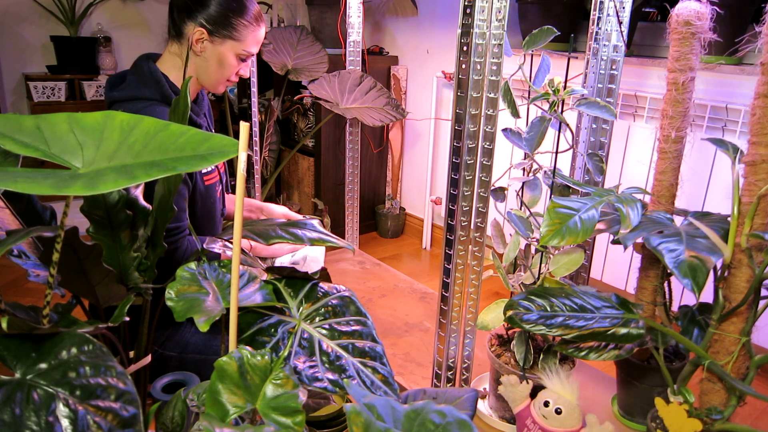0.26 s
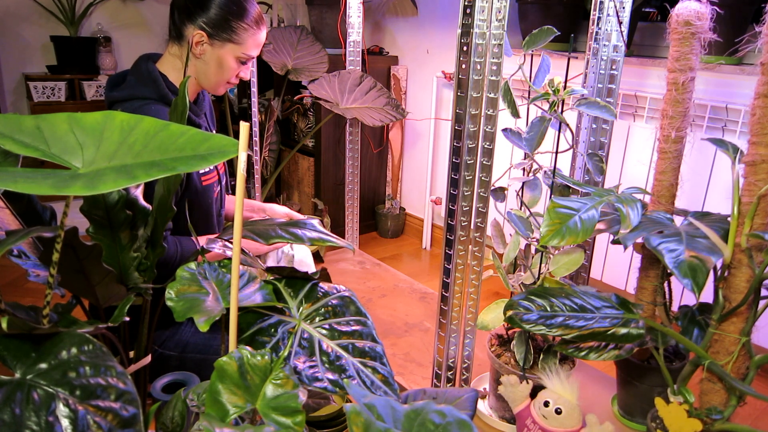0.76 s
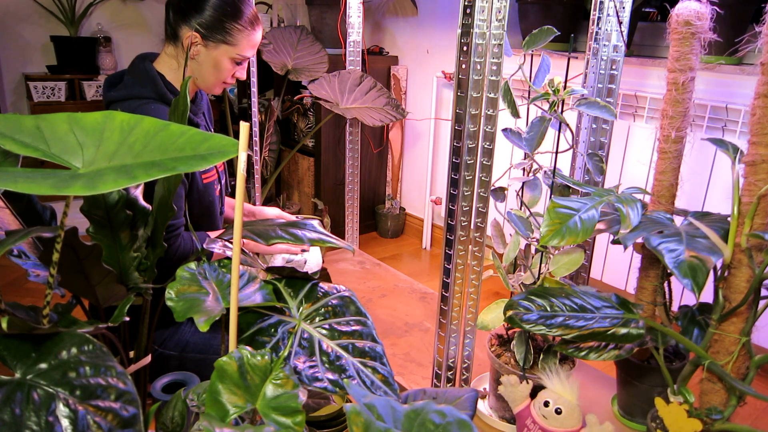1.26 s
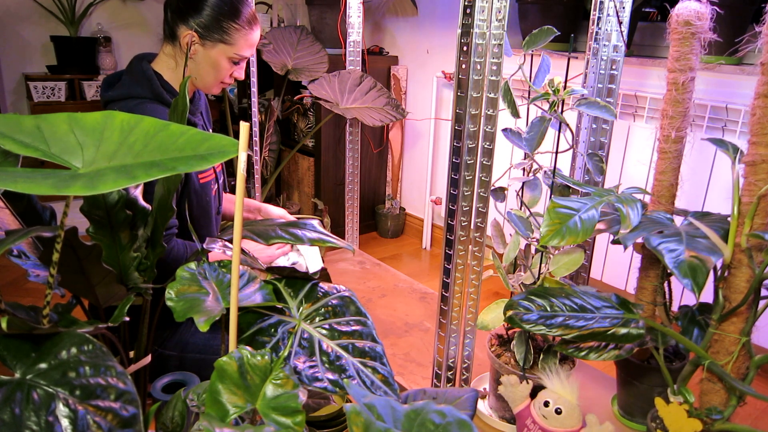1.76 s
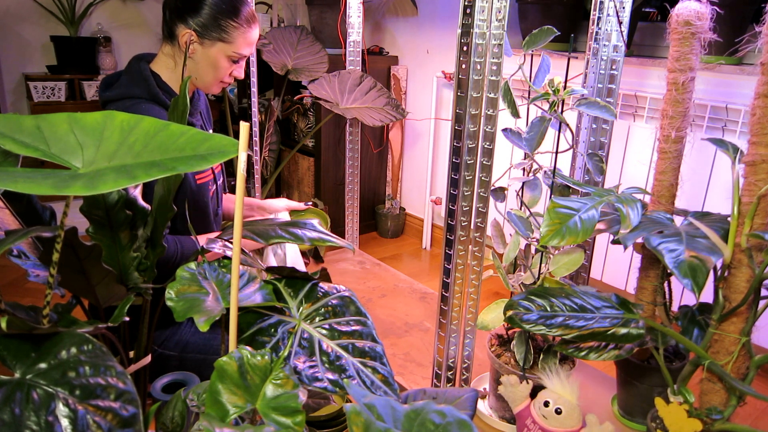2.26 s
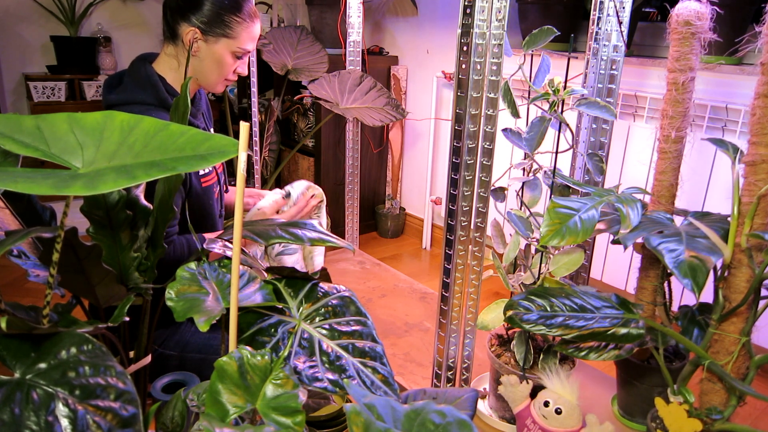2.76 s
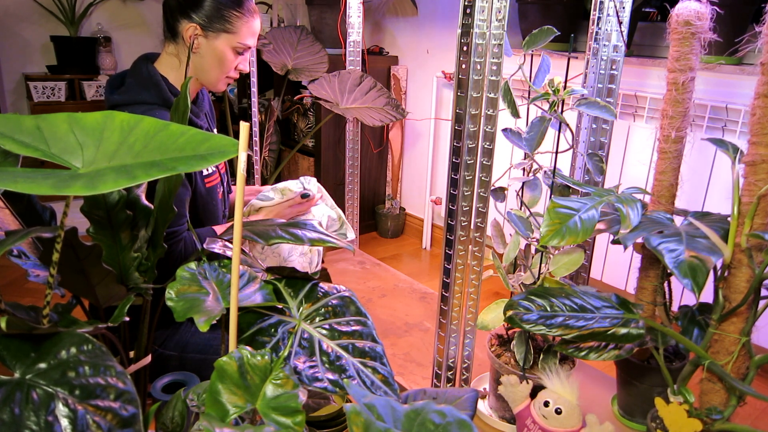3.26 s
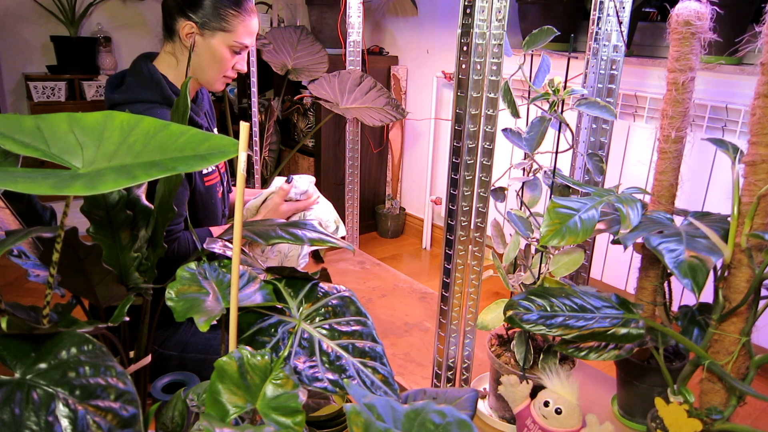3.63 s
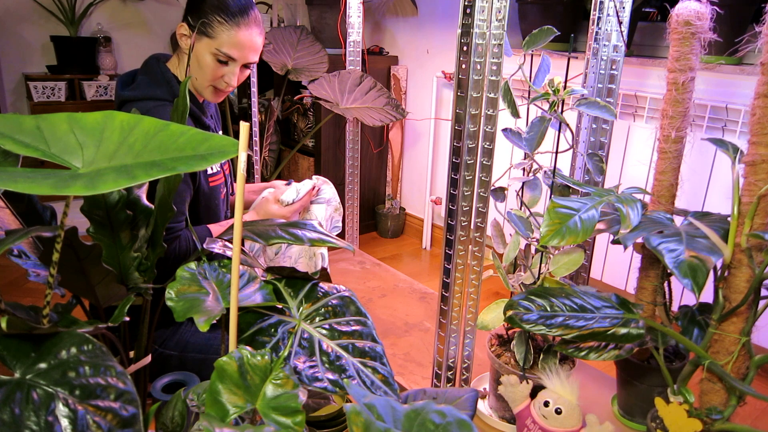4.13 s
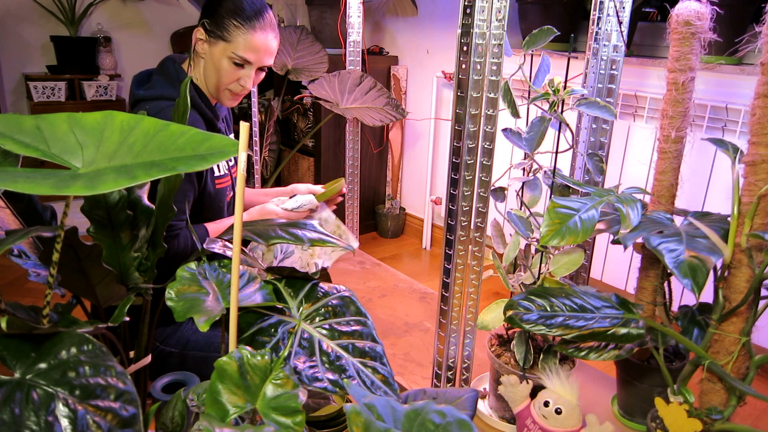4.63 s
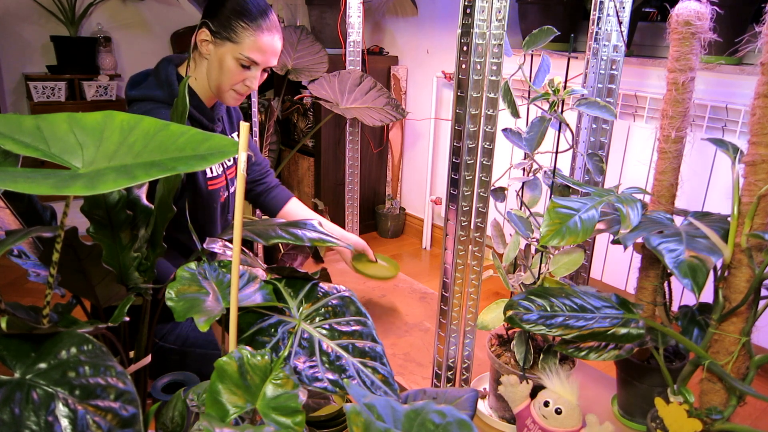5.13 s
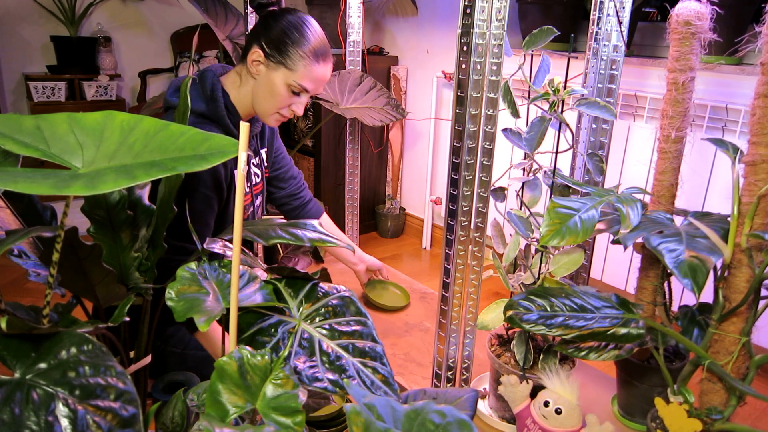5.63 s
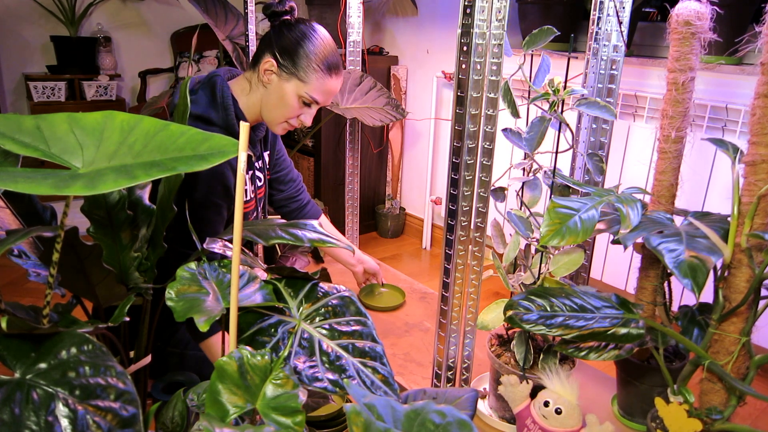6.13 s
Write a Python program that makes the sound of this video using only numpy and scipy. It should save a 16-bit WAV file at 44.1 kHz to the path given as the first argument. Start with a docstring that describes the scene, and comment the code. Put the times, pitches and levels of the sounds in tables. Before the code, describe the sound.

A small, hard-surfaced room with a faint low rumble and short, dense echoes, heard fairly close in stereo. A dull bump opens at 0 s, then cloth rubs plastic in quick uneven strokes until about 2.2 s: airy hiss with a hollow, grainy scrub, strongest around 0.2, 1.1 and 1.4-1.6 s, with a tick at 1.4. At 2.25-2.35 s plastic ticks and bumps cluster. From 2.4 to 4.7 s the wiping is much fainter, with soft fabric crumples, low pats, tiny ticks at 3.2 and 4.4, and a thin squeak near 4.5. A dull bump comes at 4.72, a slight finger slip at 4.95, then near quiet. At 5.49 s a sharp, loud plastic knock cracks on the floor, chatters and rings for about a third of a second. Muted bumps follow at 5.7-5.95. At 6.28-6.34 s a short scrape, ticks and low wooden booms mark a soft set-down.

```python
"""A cloth wipes plastic plant saucers in quick strokes, firmly at first, then lightly round a rim.
Hiss and scrub are uneven noise driven by speed and pressure; swishes, pats, ticks and bumps join in.
Then one saucer knocks sharply on the floor, as a burst of cracks and ringing tones.
Last, a saucer is set down softly with a short scrape and low booms.
Throughout, a small, hard room answers over a faint rumble; table levels are set before its echoes."""
import sys
import numpy as np
from scipy import signal
from scipy.fft import rfft, irfft, next_fast_len
from scipy.io import wavfile
from scipy.ndimage import uniform_filter1d, map_coordinates

SR = 44100
rng = np.random.default_rng(int(sys.argv[2]) if len(sys.argv) > 2 else 0)


def put_to_file(sound):
    """Save the sound as 16-bit audio at rate SR, in the file named by the first command-line argument."""
    columns = np.atleast_2d(sound).T  # one column per channel
    safe = np.clip(columns, -1, 1)
    whole_steps = np.round(safe * 32767)
    wavfile.write(sys.argv[1], SR, whole_steps.astype(np.int16))


N = 281647
TIME = np.arange(N) / SR  # seconds from the start of the scene
AGE = np.arange(SR // 2) / SR  # seconds from the start of one short sound
WORK_ENDS_S = 4.8
TOUCH_RISE_S, TOUCH_RELEASE_S = 0.017, 0.03  # how fast a light touch takes hold and lets go


def amp(db):
    """Turn decibels into a gain."""
    return 10 ** (np.asarray(db) / 20)


def unit(x):
    """Scale x to an average (rms) level of 1."""
    return x / np.sqrt(np.mean(x ** 2) + 1e-20)


def along(points, hz):
    """Read a curve of (Hz, value) points on a log frequency axis."""
    f, v = np.transpose(points)
    return np.interp(np.log(hz + 1), np.log(f + 1), v)


def wobble(rate):
    """A smooth random curve with this many new random values a second."""
    return map_coordinates(rng.standard_normal(2048), [TIME * rate], mode="wrap")


def coloured(x, level_db):
    """Filter x to the gain level_db(Hz), with no sound before its cause."""
    m = 2 * next_fast_len(x.shape[-1] // 2 + 4096)
    gain = np.maximum(amp(level_db(np.fft.rfftfreq(m, 1 / SR))), 1e-6)
    # folding the cepstrum forward in time makes the filter minimum phase
    cepstrum = irfft(np.log(gain))
    cepstrum[1:m // 2] *= 2
    cepstrum[m // 2 + 1:] = 0
    response = np.exp(rfft(cepstrum))
    return irfft(rfft(x, m) * response, m)[..., :x.shape[-1]]


def shaped(x, spectrum):
    """Filter x by a (Hz, dB) spectrum and scale it to rms 1."""
    return unit(coloured(x, lambda hz: along(spectrum, hz)))


def resonant(x, peaks):
    """Lift x around each (Hz, width in Hz, lift in dB) resonance."""
    return coloured(x, lambda hz: sum(db / (1 + (2 * (hz - centre) / width) ** 2)
                                      for centre, width, db in peaks))


def burst(t60):
    """A puff of noise that falls by 60 dB in t60 seconds."""
    return rng.standard_normal(len(AGE)) * amp(-60 * AGE / t60)


def add(track, s, sound):
    """Mix a sound into a track at time s."""
    part = track[max(round(s * SR), 0):][:len(sound)]
    part += sound[:len(part)]


def stroke(length_s, rise_s, release_s, change_db=0):
    """Gain of one rub: it takes hold, steadily gains or loses strength, then stops."""
    t = np.arange(int((length_s + release_s) * SR)) / SR
    rise = np.clip(t / rise_s, 0, 1)
    release = np.clip(1 - (t - length_s) / release_s, 0, 1)
    return np.sin(rise * release * np.pi / 2) ** 2 * amp(change_db * t / length_s)


def touches(rows):
    """Gain over time of brief, even rubs given as (start s, length s, dB)."""
    gain = np.zeros(N)
    for s, length_s, db in rows:
        add(gain, s, amp(db) * stroke(length_s, TOUCH_RISE_S, TOUCH_RELEASE_S))
    return gain


def pat(hz, swell_cycles=1.4):
    """A soft thump that rises and dies within a few cycles of its pitch."""
    cycles = AGE * hz
    swell = (cycles / swell_cycles) ** 2 * np.exp(2 - 2 * cycles / swell_cycles)
    return swell * np.sin(2 * np.pi * cycles)


def fibres(grain_db, flutter_db):
    """Countless fibres or rough spots catch and slip: noise made grainy and clumpy."""
    grain = grain_db * rng.standard_normal(N)
    flutter = flutter_db * wobble(70)
    return rng.standard_normal(N) * amp(grain + flutter)


def shifting(x, depth_db):
    """The moving hand covers and uncovers narrow resonances, so the colour keeps changing."""
    z = signal.stft(x, nperseg=512)[2]
    field = rng.standard_normal(z.shape[1:])
    # axis 1 is time, axis 0 is frequency
    field = uniform_filter1d(uniform_filter1d(field, size=14, axis=1), size=6, axis=1)
    field = unit(field) + 0.5 * unit(uniform_filter1d(field, size=9, axis=0))
    return signal.istft(z * unit(amp(depth_db * field)), nperseg=512)[1][:, :N]


# How fast the room's echoes die. Each row: frequency in Hz, time to fall by 60 dB in seconds.
ROOM = [(150, 0.39), (400, 0.46), (1000, 0.52), (2500, 0.45), (6000, 0.39), (12000, 0.3)]
# How alike the echoes are at the two ears. Each row: frequency in Hz, likeness (1 is identical).
ALIKE = [(100, 0.43), (500, 0.46), (1200, 0.26), (3000, 0.57), (7000, 0.49), (12000, .05)]


def in_room(x, wet_db):
    """Hard walls return dense, fading echoes that differ between the two ears."""
    hz, t, z = signal.stft(rng.standard_normal((2, SR * 3 // 4)), SR, nperseg=256)
    turn = np.arccos(np.clip(along(ALIKE, hz), -1, 1)) / 2
    shares = np.array([np.cos(turn), np.sin(turn)])[:, :, None]  # common part, differing part
    z = z * amp(-60 * t / along(ROOM, hz)[:, None]) * shares
    mid, side = signal.istft(z, SR, nperseg=256)[1]
    build_up = 1 - np.exp(-np.arange(len(mid)) / SR / 0.00043)
    tail = np.array([mid + side, mid - side]) * build_up
    echoes = signal.fftconvolve(x[None], tail / np.linalg.norm(tail[0]), axes=1)[:, :N]
    return (x + amp(wet_db) * echoes) / np.hypot(1, amp(wet_db))


def wide(spectrum, side_db):
    """Stereo noise whose two ears differ by side_db more than they agree."""
    mid, side = shaped(rng.standard_normal((2, N)), spectrum) * amp([[0], [side_db]])
    return unit(np.array([mid + side, mid - side]))


def soft_pats(count=30, spread_db=3):
    """Arms and cloth pat lightly against the body at random while the hands work."""
    track = np.zeros(N)
    for when, pitch, size in rng.uniform(0, 1, (count, 3)):
        level = amp(spread_db * (2 * size + 1.0))
        add(track, when * WORK_ENDS_S, level * pat(105 * 3.2 ** (pitch ** 2)))
    return track


# Tone of the room's rumble. Each row: frequency in Hz, relative level in dB per Hz.
RUMBLE = [(20, -20), (50, -2.5), (110, 4), (250, -5), (600, -6), (1100, -5.5), (2200, -12.5), (5000, -20),
          (10000, -24.5), (15000, -52.5)]
# Tone of the arms' rustle. Each row: frequency in Hz, relative level in dB per Hz.
HANDLING = [(40, -35.5), (75, -3.5), (120, -2), (220, -2.5), (400, -7), (800, -14.5), (2000, -42.5)]
# How much the arms and clothes rustle. Each row: time in seconds, gain in dB.
ARMS = [(0, -58), (.7, -66), (2.3, -67), (3.3, -65), (3.9, -77), (4.7, -66), (5.3, -74), (5.9, -55),
        (6.39, -85)]


def background():
    """Very wide noise makes the room's rumble; lumpy low noise and pats make the arms' rustle."""
    pats = soft_pats() + soft_pats() * np.array([[1], [-1]])
    seconds, levels_db = np.transpose(ARMS)
    arm_gain = amp(np.interp(TIME, seconds, levels_db))
    lumps = amp(2.7 * np.tanh(wobble(18.0)))
    arms = arm_gain * (lumps * wide(HANDLING, side_db=12.0) + amp(-4) * pats)
    return amp(-68.5) * wide(RUMBLE, side_db=5.0) + arms


# Heavier pats of cloth and forearm. Each row: time in seconds, peak scale in dB, pitch in Hz.
PATS = [(0.332, -53, 240), (1.0, -55, 356), (1.069, -60, 144), (1.536, -58, 139), (2.179, -54.5, 117),
        (2.338, -56.5, 231), (2.655, -69, 196), (2.737, -59, 127), (2.786, -60, 126), (3.276, -60, 157),
        (3.316, -63, 168.6), (3.439, -61, 202), (3.572, -66, 135), (3.628, -68, 129), (3.655, -61, 396),
        (3.714, -69, 135.6), (4.002, -63, 126), (4.258, -59.5, 160), (4.348, -66, 162), (4.61, -61, 256)]


def heavy_pats():
    """The cloth or a forearm lands on the lap with a soft, low thump."""
    track = np.zeros(N)
    for s, db, hz in PATS:
        add(track, s, amp(db) * pat(hz))
    return in_room(track, wet_db=4.0)


# Tone of the crumpling cloth. Each row: frequency in Hz, relative level in dB per Hz.
FOLDS = [(80, -19.5), (180, 3.5), (330, -0.5), (550, -11), (900, -14.5), (1500, -25.5), (4000, -29)]


def folds(level_db=-76, clump_db=5):
    """The cloth crumples softly, in uneven little clumps, for as long as the hands work."""
    working = np.clip((WORK_ENDS_S - TIME) / .2, 0, 1)
    crumple = fibres(grain_db=3, flutter_db=1) * amp(clump_db * np.tanh(wobble(16)))
    return in_room(amp(level_db) * working * shaped(crumple, FOLDS), wet_db=2.0)


# The wooden floor booming. Each row: time in seconds, peak scale in dB, pitch in Hz.
BOOMS = [(5.489, -39, 207), (5.723, -55.5, 215), (5.835, -51, 207), (6.295, -37, 225), (6.338, -44, 213)]


def floor_booms():
    """The floor gives a short, low boom when the saucer's weight lands on it."""
    track = np.zeros(N)
    for s, db, hz in BOOMS:
        add(track, s, amp(db) * pat(hz, swell_cycles=5.8))
    return in_room(track, wet_db=-3)


# Dull bumps of saucer on hand or floor. Each row: time in seconds, peak in dB,
# centre in Hz, half-width in octaves, time for the noise to fall by 60 dB in seconds.
BUMPS = [(0.002, -38, 760, 0.88, 0.24), (0.004, -46.5, 480, 0.62, 0.11), (2.273, -36, 1270, 0.74, 0.12),
         (2.273, -50, 602, 0.16, 0.19), (2.32, -42, 875, 0.87, 0.18), (3.14, -62, 730, 0.28, 0.12),
         (3.41, -69, 960, 0.24, 0.082), (3.99, -64, 1016, 0.19, 0.35), (4.425, -62, 760, .3, 0.19),
         (4.72, -51, 287, 0.5, 0.26), (4.722, -48, 1760, 0.63, .16), (4.738, -41.5, 800, 0.23, 0.1),
         (4.835, -56, 770, 0.37, .06), (4.962, -57.5, 780, 0.15, 0.03), (5.718, -42, 284, 0.69, 0.12),
         (5.755, -41, 394, 0.27, 0.059), (5.825, -48, 434, 0.79, 0.25), (5.95, -51.5, 300, 0.97, 0.28),
         (6.294, -39, 320, 0.36, 0.071), (6.33, -31.5, 350, 0.27, 0.069), (6.337, -34, 580, 0.49, 0.05)]


def bumps():
    """Soft contacts stir only one low or middle region of the saucer."""
    track = np.zeros(N)
    for s, db, centre_hz, octaves, t60 in BUMPS:
        hump = lambda hz: -20 * np.log10(1 + (np.log2((hz + 1) / centre_hz) / octaves) ** 4 / 2)
        thud = coloured(burst(t60), hump)
        add(track, s, amp(db) * thud / np.abs(thud).max())
    return in_room(track, wet_db=-0.5)


# Light ticks of plastic. Each row: time in seconds, peak in dB.
TICKS = [(1.4176, -30.5), (2.2434, -20.5), (2.2748, -25.5), (2.323, -23.5), (2.7232, -63), (3.2067, -39),
         (3.2148, -39), (4.4, -43), (4.722, -39), (6.287, -33), (6.2967, -24), (6.311, -35)]
# Tone of a tick. Each row: frequency in Hz, relative level in dB per Hz.
TICK = [(120, -63.5), (400, -28), (1500, -12), (2300, -0.5), (4500, -1.5), (8000, -8.5), (12000, -21.5),
        (16000, -52.5)]


def ticks():
    """A nail or an edge catches on the plastic: a snap and a very short scuff."""
    track = np.zeros(N)
    for s, db in TICKS:
        snap = shaped(burst(0.0053) + amp(-14.0) * burst(0.052), TICK)
        add(track, s, amp(db) * snap / np.abs(snap).max())
    return in_room(track, wet_db=1.5)


# The rim grating as it is put down. Each row: start in seconds, length in seconds, level in dB.
SCRAPES = [(6.278, 0.039, -39)]
# Tone of plastic grating on wood. Each row: frequency in Hz, relative level in dB per Hz.
GRATE = [(100, -24), (220, 0.5), (450, -1.5), (600, 4.5), (850, -3), (1100, -16), (1750, -20), (2400, -9.5),
         (4500, -15), (7000, -25), (11000, -26.5), (14000, -63)]


def scrape():
    """The rim skids a little way over the floor in coarse catches."""
    catches = fibres(grain_db=9, flutter_db=1)
    return in_room(touches(SCRAPES) * shaped(catches, GRATE), wet_db=-3.5)


# The rim striking and chattering. Each row: time in seconds, relative crack strength in dB,
# peak of the hard snap in dB.
KNOCKS = [(5.486, 0.5, -10), (5.4882, 0, -9), (5.4916, -5.5, -18), (5.4995, -5.5, -33), (5.507, -4, -28.5),
          (5.514, -6, -34.5)]
# The saucer's ringing tones. Each row: pitch in Hz, relative level in dB,
# time to fall by 60 dB in seconds.
SAUCER = [(205, -2.5, 0.41), (247, -1.5, 0.33), (397, -1.5, 0.31), (582, -4.5, 0.38), (750, -0.5, 0.34),
          (905, 4, 0.38), (988, 2.5, 0.33), (1550, -0.5, 0.36), (1724, -2.5, .3), (2050, -4.5, 0.33),
          (2205, -1.5, 0.19), (2220, -5, 0.33), (2331, -4.5, 0.21), (2460, -3.5, 0.35), (2590, -6, 0.46),
          (3320, -3.5, .2), (3540, -11.5, 0.28)]
# Tone of the hard edge's snap. Each row: frequency in Hz, relative level in dB per Hz.
SNAP = [(100, -69.5), (500, -31), (1300, -5), (2200, -1), (4300, 1.5), (6000, -7), (10000, -17.5),
        (14000, -21.5), (16500, -48.5)]
# Tone of the fuller crack. Each row: frequency in Hz, relative level in dB per Hz.
CRACK = [(100, -40.5), (160, -28.5), (210, -6.5), (320, -11.5), (520, -7.5), (720, -7.5), (950, 2.5),
         (1300, -6), (2300, -1), (3000, -8.5), (4400, -12), (6000, -17), (10000, -21), (14000, -28),
         (16500, -55)]


def knock(rise_s=0.00048, crack_db=-38.0, ring_db=-32.0, snap_t60=0.0034):
    """The rim snaps against the floor, chatters and leaves the saucer ringing."""
    cracks, ring = np.zeros((2, N)), np.zeros(N)
    for s, db, snap_db in KNOCKS:
        blow = np.zeros(N)
        snap = shaped(burst(snap_t60), SNAP)
        add(blow, s, amp(snap_db) * snap / np.abs(snap).max())
        crack = shaped(burst(0.024) * (1 - np.exp(-AGE / rise_s)), CRACK)
        add(blow, s, amp(crack_db + db) * crack)
        cracks += in_room(blow, wet_db=-3.5)
    first_strike_s = KNOCKS[0][0]
    for hz, db, t60 in SAUCER:
        tone = np.sin(2 * np.pi * hz * AGE + rng.uniform(0, 2 * np.pi))
        build_up = 1 - np.exp(-AGE * hz / 2)
        add(ring, first_strike_s, amp(ring_db + db - 60 * AGE / t60) * tone * build_up)
    return cracks + in_room(ring, wet_db=-16.0)


# A fingertip slipping off the rim. Each row: start in seconds, length in seconds, level in dB.
SLIPS = [(4.947, 0.03, -57.5)]
# The rim squeaking under a finger. Each row: start in seconds, length in seconds, level in dB.
SQUEAKS = [(4.505, 0.057, -57), (4.952, 0.0107, -61.5)]
# Resonances of the fingertip's chirp. Each row: centre in Hz, width in Hz, lift in dB.
CHIRP = [(5810, 110, 10), (7150, 130, 15), (7760, 200, 14.5), (9050, 180, 14), (9700, 170, 13),
         (10660, 130, 12), (12020, 140, 19)]


def finger_slip(squeak_hz=2770, half_width_hz=42):
    """A finger drags on the rim with a rough squeak of fixed pitch and slips off with a bright chirp."""
    skin = fibres(grain_db=6, flutter_db=1)
    chirp_tone = [(1000, -21), (3500, -5), (6000, -4), (9000, 0), (12000, -0.5), (15000, -24)]
    chirp = shaped(resonant(skin, CHIRP), chirp_tone)
    narrow = lambda hz: -20 * np.log10(1 + ((hz - squeak_hz) / half_width_hz) ** 2)
    squeak = unit(coloured(rng.standard_normal(N), narrow))
    return in_room(touches(SLIPS) * chirp, wet_db=-5) + in_room(touches(SQUEAKS) * squeak, wet_db=-10)


# Swishes of sliding cloth and sleeve. Each row: start in seconds, length in seconds,
# first pitch in Hz, last pitch in Hz, half-width in Hz, level in dB.
SWISHES = [(0.688, 0.22, 2242, 2153, 250, -56.5), (0.919, 0.11, 1180, 1263, 150, -53),
           (0.992, 0.13, 1745, 2150, 400, -49), (1.051, 0.085, 1340, 1533, 230, -50),
           (1.08, 0.19, 1704, 1707, 478, -54.5), (1.403, 0.3, 2150, 1710, 396, -52.5),
           (1.798, 0.13, 3180, 3290, 600, -48), (1.8, 0.4, 2118, 2056, 260, -59),
           (2.78, 0.11, 3580, 3590, 500, -62.5), (3.192, 0.042, 2615, 2547, 790, -54),
           (3.292, 0.079, 2830, 2830, 750, -64.5), (3.531, 0.1, 3590, 3580, 850, -67.5),
           (3.925, 0.12, 2090, 2114, 250, -70.5), (4.219, .06, 4280, 5170, 260, -56.5),
           (4.257, 0.071, 5700, 6240, 306, -57), (4.322, 0.042, 4860, 4370, 500, -60),
           (4.372, 0.11, 2850, 4400, 230, -58.5), (4.445, 0.043, 4290, 5670, 350, -52),
           (4.472, .06, 6000, 6400, 300, -52.5), (4.463, 0.1, 2240, 2110, 250, -63),
           (5.28, .24, 5180, 4800, 330, -79.5)]


def cloth_swishes():
    """A band of noise glides in pitch, swelling and fading, as a fold of cloth slides along."""
    swish = np.zeros(N)
    for s, length_s, first_hz, last_hz, width_hz, db in SWISHES:
        n = int(length_s * SR)
        low_pass = lambda hz: -20 * np.log10(1 + (hz / width_hz) ** 4)
        band = unit(coloured(rng.standard_normal((2, len(AGE))), low_pass))[:, -n:]
        # two slow noises on a gliding carrier make a band of noise around its pitch
        phase = 2 * np.pi * np.cumsum(np.linspace(first_hz, last_hz, n)) / SR
        glide = band[0] * np.cos(phase) + band[1] * np.sin(phase)
        add(swish, s, amp(db) * np.sin(np.linspace(0, np.pi, n)) * glide)
    return shifting(in_room(swish, wet_db=-2.5), depth_db=2.5)


# Reflections off nearby floor, shelves and leaves. Each row: delay in seconds, gain.
WALLS = [(.0011, .16), (.0029, -.2), (.0047, .2), (.0083, .2), (.0146, -.2)]


def early_walls(x, drift_s=0.000297):
    """A few quick reflections comb the sound; the comb slides as the hands move."""
    reflections = sum(gain * np.interp(TIME - delay - drift_s * wobble(5), TIME, x, left=0)
                      for delay, gain in WALLS)
    return x + reflections


def flexed(x, share=.014, rate=6):
    """The changing grip flexes the saucer, sliding its resonances a little up and down."""
    return map_coordinates(x, [np.cumsum(1 + share * wobble(rate))], mode="mirror")


# Strokes of the cloth. Each row: start in seconds, length in seconds, rise in seconds,
# hiss gain in dB, change by the end in dB, scrub from pressure in dB over the hiss.
STROKES = [(-0.025, 0.072, 0.01, -50, -5, -8.5), (0.092, 0.39, 0.12, -39, -6.5, -5),
           (0.487, 0.19, 0.1, -42, -7, -9), (0.69, 0.18, 0.068, -45.5, -7, -5.5),
           (0.827, 0.13, 0.15, -44.5, 5, -6), (0.98, 0.091, 0.048, -42.5, 2, -4.5),
           (1.103, 0.11, 0.014, -36.5, -11, -5), (1.298, 0.098, 0.028, -74, 13.5, 1),
           (1.39, 0.25, 0.13, -33, -9.5, -10.5), (1.77, 0.43, 0.069, -41, -6, -12),
           (2.229, 0.17, 0.018, -45.5, -7.5, -5.5), (2.41, 0.18, 0.043, -66, -0.5, -1.5),
           (2.698, 0.15, 0.021, -61, 0.5, -10), (2.908, 0.29, 0.082, -56.5, -3, -3.5),
           (3.28, 0.053, 0.025, -62.5, -1.5, -5), (3.497, 0.27, 0.028, -72, -8, -2),
           (3.752, 0.17, 0.098, -70.5, 4.5, -4), (3.95, 0.023, 0.051, -58.5, 1.5, -4.5),
           (4.166, 0.29, 0.16, -55.5, -3.5, -9.5), (4.412, 0.13, 0.11, -55, 1, 0.5),
           (4.573, 0.13, 0.022, -58.5, -1, -6.5), (4.675, 0.021, 0.086, -51, 0.5, -6)]
# Light brushing as the arm reaches down and the saucer slides to rest.
# Each row: start in seconds, length in seconds, level in dB.
BRUSHES = [(5.085, 0.015, -71.5), (5.70, 0.024, -64), (5.80, 0.025, -62), (5.9, 0.064, -69.5),
           (5.945, 0.019, -61.5), (6.273, 0.018, -48.5)]
# Tone of the cloth's hiss. Each row: frequency in Hz, relative level in dB per Hz.
HISS = [(200, -36), (500, -42), (1200, -30), (2300, -9), (3600, -3), (5500, 0.5), (8000, -1), (11000, -11),
        (13500, -45.5), (15000, -61)]
# Tone of a fast stroke's extra sheen. Each row: frequency in Hz, relative level in dB per Hz.
SHEEN = [(3000, -35), (6000, -13.5), (9000, -1), (12000, -3), (14000, -12), (15200, -35)]
# Tone of the scrub. Each row: frequency in Hz, relative level in dB per Hz.
SCRUB = [(120, -35.5), (300, -15), (600, -17), (900, -10), (1500, -9), (2200, -3.5), (3200, -3.5),
         (5000, -2), (10000, -55)]
# Resonances of the rubbed plastic. Each row: centre in Hz, width in Hz, lift in dB.
SHELL = [(566, 40, 14.5), (864, 39, 12), (1270, 55, 6), (1647, 43, 10.5), (2057, 82, 11.5), (2235, 50, 9.5),
         (2720, 80, 11.5), (3287, 92, 8.5), (3726, 240, 6.5)]


def wiping(sheen_growth=1.321, sheen_db=11, unsteady_db=-1.24, pressure_db=3.0, release_s=0.062):
    """Speed makes the cloth hiss, and brighter; pressure makes the plastic under it scrub."""
    speed, pressure = np.zeros(N), np.zeros(N)
    for s, length_s, rise_s, hiss_db, change_db, scrub_db in STROKES:
        gain = amp(hiss_db) * stroke(length_s, rise_s, release_s, change_db)
        add(speed, s, gain)
        add(pressure, s, amp(scrub_db) * gain)
    speed = speed * amp(unsteady_db * wobble(21.95))
    pressure = pressure * amp(pressure_db * wobble(22))

    hiss = speed * shaped(early_walls(fibres(grain_db=4.0, flutter_db=2)), HISS)
    # a power above 1 makes the sheen grow faster than the hiss
    bright_weave = shaped(early_walls(fibres(grain_db=8.5, flutter_db=-3.0)), SHEEN)
    sheen = amp(sheen_db) * speed ** sheen_growth * bright_weave
    rubbed_plastic = flexed(resonant(fibres(grain_db=6.5, flutter_db=3.0), SHELL))
    scrub = pressure * shaped(rubbed_plastic, SCRUB)
    brush = touches(BRUSHES) * shaped(fibres(grain_db=4, flutter_db=1.5), HISS)
    rub = in_room(hiss + brush, wet_db=-1.0) + in_room(scrub + sheen, wet_db=6.0)
    return shifting(rub, depth_db=1.1)


def scene():
    """Add up all the sources, with the work of the hands a touch to the left."""
    hands = wiping() + cloth_swishes() + finger_slip() + ticks() + folds()
    hands = hands * amp([[.35], [-.35]])
    return hands + bumps() + scrape() + knock() + floor_booms() + background() + heavy_pats()


def record(dry, top_hz=16000):
    """A steep filter removes the sound above its upper limit."""
    return coloured(dry, lambda hz: -20 * np.log10(1 + (hz / top_hz) ** 80))


dry = scene()
out = record(dry)
put_to_file(out)
```